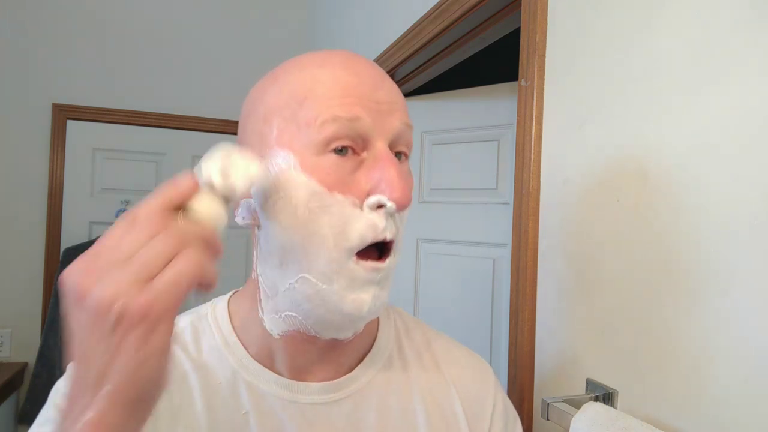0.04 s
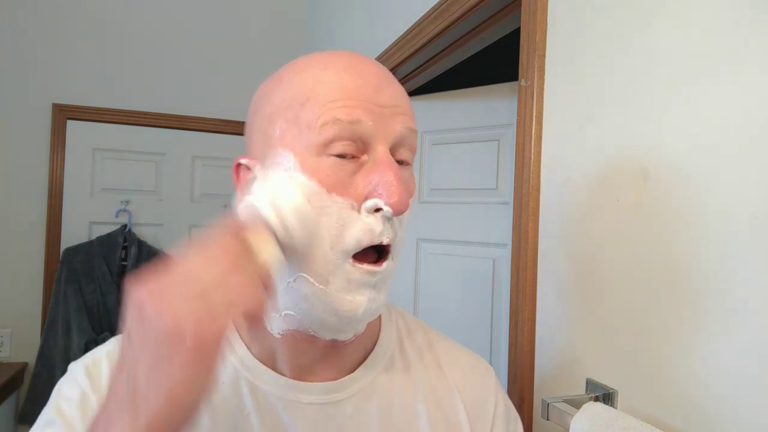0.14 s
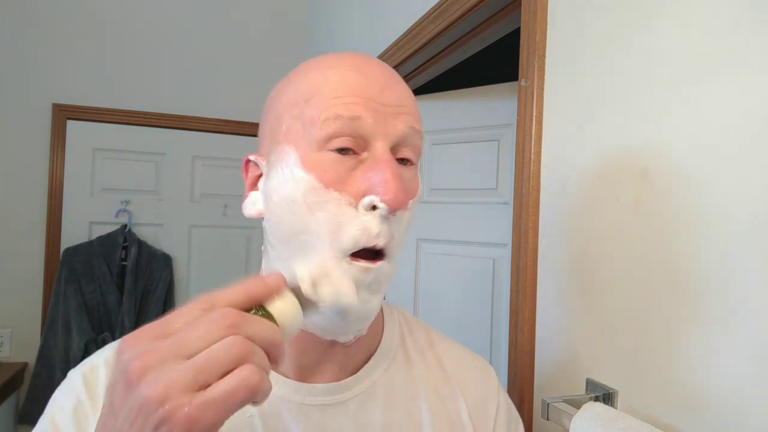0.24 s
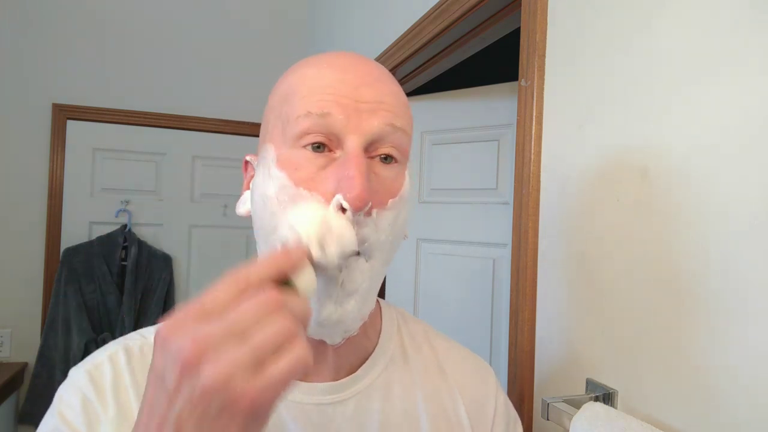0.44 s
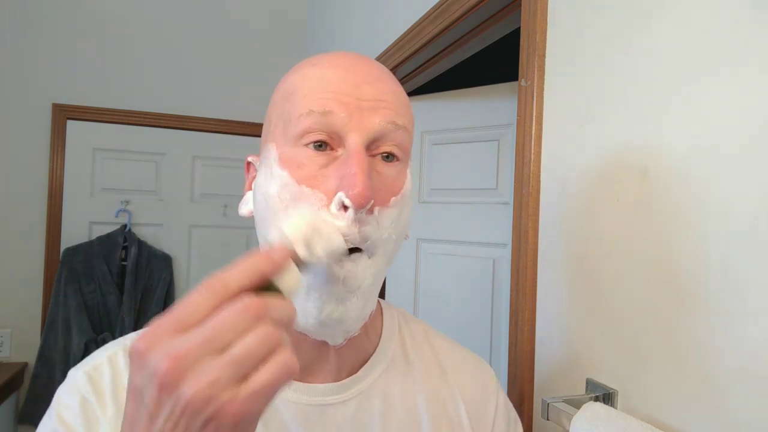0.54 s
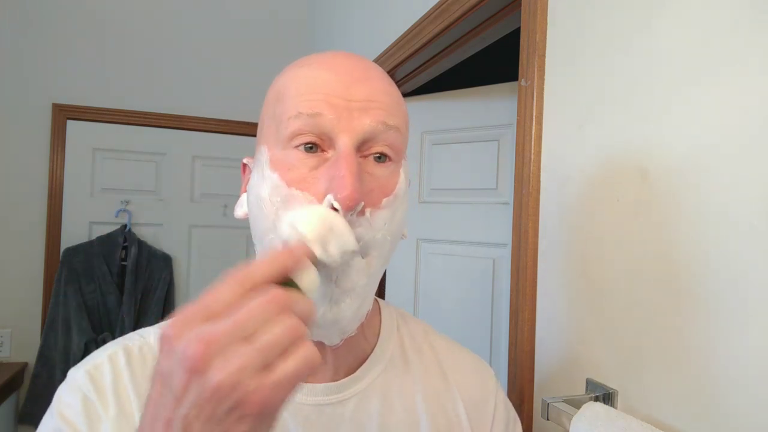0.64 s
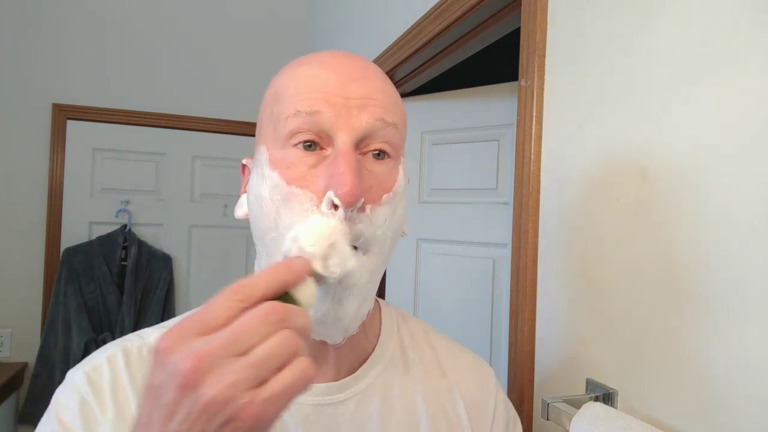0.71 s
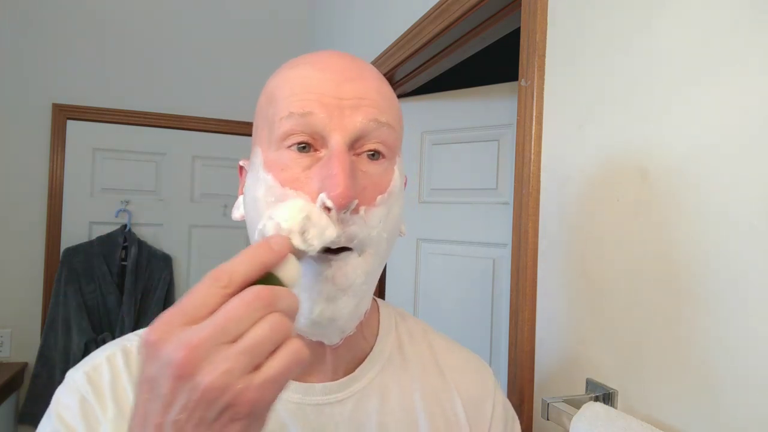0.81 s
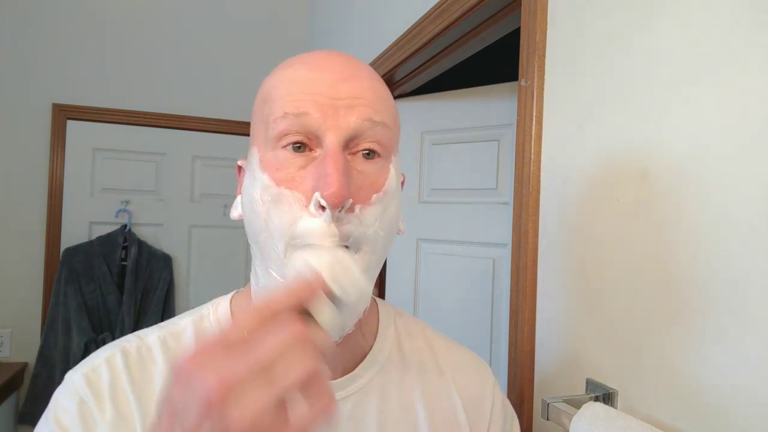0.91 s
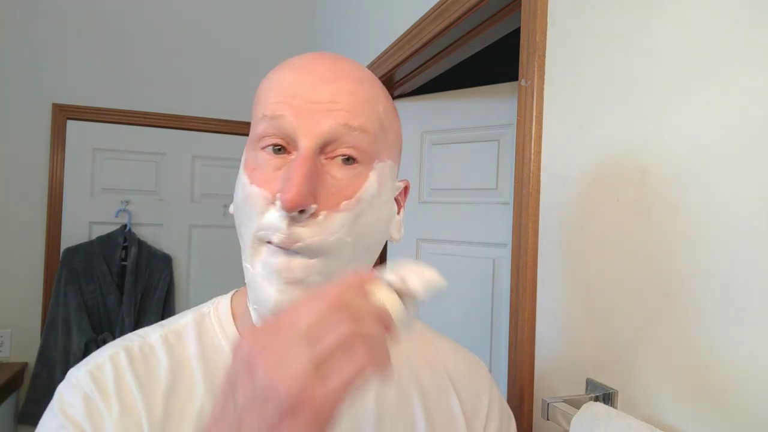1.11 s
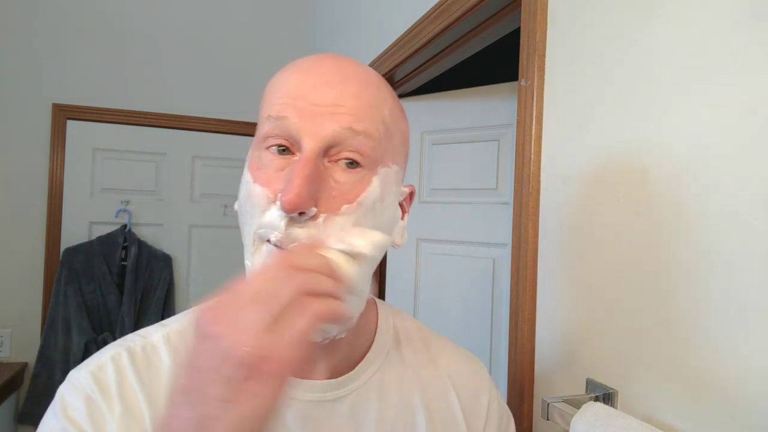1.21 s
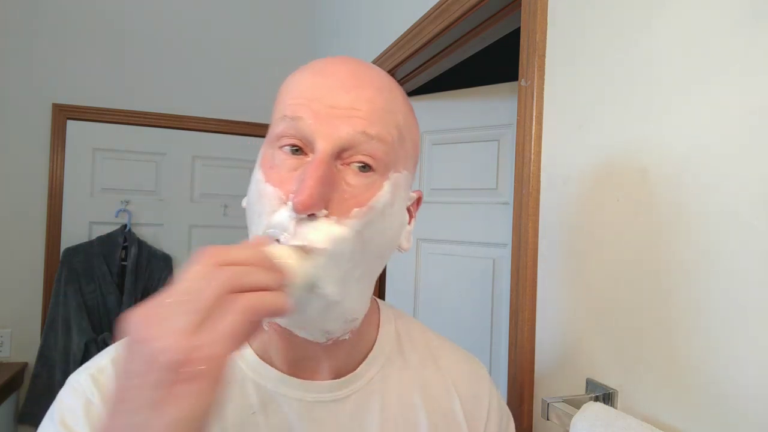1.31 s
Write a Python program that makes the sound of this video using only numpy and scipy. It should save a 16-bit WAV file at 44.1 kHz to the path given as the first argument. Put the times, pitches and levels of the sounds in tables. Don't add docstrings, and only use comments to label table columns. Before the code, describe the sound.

Wet shaving brush dabs thick lather on skin, one loud plop then fainter pats, room ringing.

```python
import sys
import numpy as np
from scipy import signal
from scipy.io import wavfile
from scipy.ndimage import uniform_filter1d

SR = 44100
rng = np.random.default_rng(int(sys.argv[2]) if len(sys.argv) > 2 else 0)


def to_wav(s):
    ch = np.atleast_2d(s).T
    pcm = np.round(np.clip(ch, -1, 1) * 32767)
    wavfile.write(sys.argv[1], SR, pcm.astype(np.int16))


def natural_amplitude(level_db):
    exponent = np.asarray(level_db, float) / 20
    return 10 ** exponent


N = 59535
LEAD = 4410

# f/Hz, density/dB per Hz
HISS_SPECTRUM = [(76, -29), (130, -10.5), (172, -17.5), (279, -18.5), (335, -13.5), (402, -19),
                 (846, -22.5), (2830, -33.5), (16000, -40)]
# f/Hz, width/Hz, level/dB
FAN_RUMBLE = [(30.8, 28, -82), (56.4, 29, -69), (77, 21, -70.5), (114.1, 11.4, -70), (226, 43, -76),
              (320, 270, -78.5)]
# t/s, f/Hz, level/dB
FAN_TONE = [(0.0, 105.8, -70.5), (0.204, 110.9, -70.5), (0.232, 105.7, -70), (0.386, 114, -81),
            (0.425, 98.6, -58), (0.466, 89.5, -68), (0.732, 87.6, -58.5), (0.916, 91.3, -64.5),
            (0.947, 96, -64), (1.069, 94.83, -64), (1.154, 119.7, -70), (1.192, 115.5, -91),
            (1.235, 103.6, -58), (1.286, 97.6, -67), (1.322, 83, -56.5), (1.35, 84, -67)]
# t/s, level/dB
BRISTLE_DRAG = [(0.0, -71), (0.044, -71.5), (0.224, -75), (0.236, -77), (0.254, -58.5), (0.384, -75.5),
                (0.536, -72), (0.545, -61), (0.582, -76.5), (0.887, -72), (1.024, -69.5), (1.1, -89),
                (1.288, -78), (1.35, -69.5)]
# f/Hz, t60/s
WALL_DECAY = [(150, 0.72), (400, 0.91), (700, 0.62), (1300, 0.92), (2760, 0.64), (7280, 0.41),
              (14000, 0.31)]
# f/Hz, level/dB
WALL_COLOUR = [(150, -4.5), (430, -6), (800, -0.5), (1300, -5.5), (3000, 1), (7000, -0.5), (14000, 5.5)]
# f/Hz, level/dB, t60/s
STANDING_WAVES = [(278, -67, 0.77), (326, -51, 0.28), (379, -54, .75), (415.3, -53.5, 0.5),
                  (466, -60.5, 0.42), (492.6, -52, 0.36), (544, -54, 0.37), (576, -56, 0.46),
                  (619, -51.5, 0.25)]
# t/s, peak/dB, f/Hz, t60/s, share reaching the walls/dB
AIR_POCKETS = [(-.061, -27.5, 585, 0.021, -0.5), (-.06, -21, 1150, 0.0044, 5), (.2361, -16, 443, 0.029, -1),
               (.2362, -23.5, 320, 0.023, -0.5), (.2369, -17, 633, 0.0085, -11),
               (.2374, -14.5, 1135, 0.0075, 1.5), (.375, -44, 816, 0.015, 2),
               (.5403, -44, 850, 0.0077, -14), (.5421, -28.5, 740, 0.0083, -3),
               (.5424, -29, 1656, 0.0023, -5.5), (.546, -41, 537, 0.018, 2.5),
               (0.7683, -38.5, 320, 0.01, -3), (.7695, -25.5, 760, 0.0062, -2.5),
               (.7731, -32, 482, 0.0079, 1), (.9744, -35, 722.2, 0.0068, -6.5),
               (.9775, -42.5, 430, 0.0097, 0)]
# t/s, level/dB, centre f/Hz, width/Hz, t60/s
FOAM_SPLASHES = [(-.0601, -40.5, 2400, 2678, 0.017), (-.0600, -40, 4815, 4100, 0.041),
                 (.2316, -53, 7460, 3190, 0.018), (.2367, -33, 5260, 2520, 0.0091),
                 (.2389, -49, 10300, 6060, 0.022), (.2402, -43.5, 6900, 2510, 0.018),
                 (.2404, -40, 2920, 1570, 0.023), (.2407, -45, 4470, 1700, 0.016),
                 (.5321, -60, 5185, 4611, .0062), (.5409, -55, 2900, 3030, 0.016),
                 (.5411, -67, 12000, 6000, .015), (.5425, -46.5, 5700, 3500, 0.0062),
                 (.5427, -50.2, 2390, 1820, 0.0093), (.5446, -51.5, 4800, 2800, 0.027),
                 (.5461, -65, 8400, 1500, 0.011), (.5467, -51.5, 3440, 3400, 0.011),
                 (.6783, -55.2, 8800, 3704, 0.005), (.7696, -58.5, 5093, 2778, .012),
                 (.7711, -64, 2130, 1180, 0.021), (.7721, -65, 7400, 1980, 0.039),
                 (.9752, -61, 2630, 990, 0.0069), (.9951, -61, 6800, 3500, .015),
                 (1.3381, -67.5, 2280, 736.1, 0.032)]
# t/s, peak/dB, f/Hz, t60/s
FOAM_BUBBLES = [
    (0.686, -53, 5990, 0.013),
    (1, -61, 3900, 0.017),
    (0.76, -70, 7100, 0.0039),
]


def evened(x):
    return x / np.sqrt(np.mean(x ** 2) + 1e-20)


def read(points, f_hz):
    f, value = np.transpose(points)
    return np.interp(np.log(f_hz + 1), np.log(f + 1), value)


def add(mix, t_s, sound):
    part = mix[LEAD + round(t_s * SR):][:len(sound)]
    part += sound[:len(part)]


def resonate(x, f_hz, width_hz):
    turn = np.exp(2j * np.pi * f_hz * np.arange(len(x)) / SR)
    r = np.exp(-np.pi * width_hz / SR)
    return 2 * (turn * signal.lfilter([1 - r], [1, -r], x / turn)).real


def resonate_twice(x, f_hz, width_hz):
    return resonate(resonate(x, f_hz, width_hz), f_hz, width_hz)


def room_hiss():
    level_db, patch_db, flicker_db = -65, 0.8, 1.0
    frames, f_hz = N // 256 + 5, np.fft.rfftfreq(1024, 1 / SR)
    real, imag, patches = rng.standard_normal((frames, 513, 3)).T
    patches = uniform_filter1d(patches, 12, 0)
    patches = evened(uniform_filter1d(patches, 14, 1))
    flicker = patches[40]
    gain_db = read(HISS_SPECTRUM, f_hz)[:, None] + patch_db * patches + flicker_db * flicker
    z = (real + 1j * imag) * natural_amplitude(gain_db) * (f_hz > 120)[:, None]
    hiss = signal.istft(z, nperseg=1024, noverlap=768)[1][:N]
    return natural_amplitude(level_db) * evened(hiss)


def fan_rumble():
    settle = 8000
    rumble = np.zeros(N)
    for f_hz, width_hz, db in FAN_RUMBLE:
        noise = rng.standard_normal(N + settle)
        rumble += natural_amplitude(db) * evened(resonate_twice(noise, f_hz, width_hz)[settle:])
    return rumble


def fan_tone():
    t_s, f_hz, db = np.transpose(FAN_TONE)
    t = np.arange(N) / SR
    cycles = np.cumsum(np.interp(t, t_s, f_hz)) / SR
    return np.sqrt(2) * natural_amplitude(np.interp(t, t_s, db)) * np.sin(2 * np.pi * cycles)


def bristle_fizz():
    f_hz, width_hz, ticks_per_s, trim_db, spread_db = 8470, 1670, 7400, -4.5, 1.5
    sizes = natural_amplitude(spread_db * rng.exponential(1, N))
    ticks = sizes * (rng.random(N) < ticks_per_s / SR) * rng.choice([-1, 1], N)
    band = evened(resonate_twice(ticks, f_hz, width_hz))
    t_s, db = np.transpose(BRISTLE_DRAG)
    return natural_amplitude(trim_db + np.interp(np.arange(N) / SR, t_s, db)) * band


def walls(x):
    gap_s, build_s, level_db = 0.0093, 0.0036, 0.5
    taps = np.zeros(SR)
    at = np.arange(0, SR - 20, 20)
    taps[at + rng.integers(0, 20, len(at))] = rng.choice([-1., 1.], len(at))
    f_hz, t, z = signal.stft(taps, SR, nperseg=256)
    z = z * natural_amplitude(read(WALL_COLOUR, f_hz)[:, None] - 60 * t / read(WALL_DECAY, f_hz)[:, None])
    tail = signal.istft(z, SR, nperseg=256)[1]
    tail = tail / np.linalg.norm(tail)
    t = np.arange(len(tail)) / SR
    for f, db, t60_s in STANDING_WAVES:
        tail += natural_amplitude(db - 60 * t / t60_s) * np.sin(2 * np.pi * (f * t + rng.random()))
    tail *= np.clip((t - gap_s) / build_s, 0, 1)
    return natural_amplitude(level_db) * signal.fftconvolve(x, tail)[:len(x)]


def ring(db, f_hz, t60_s):
    rise_cycles = 0.27
    t = np.arange(2600) / SR
    rise = (1 - np.exp(-t * f_hz / rise_cycles)) ** 3
    return natural_amplitude(db - 60 * t / t60_s) * rise * -np.sin(2 * np.pi * f_hz * t)


def splash(db, f_hz, width_hz, t60_s):
    rise_s = 0.0001
    t = np.arange(2000) / SR
    band = evened(resonate_twice(rng.standard_normal(len(t)), f_hz, width_hz))
    burst = natural_amplitude(db - 60 * t / t60_s) * (1 - np.exp(-t / rise_s)) * band
    click = resonate_twice(1. * (t == 0), f_hz, width_hz)
    return burst, evened(click) * np.std(burst)


def pats():
    near, far = np.zeros((2, N + LEAD))
    for t_s, db, f_hz, t60_s, wall_db in AIR_POCKETS:
        add(near, t_s, ring(db, f_hz, t60_s))
        add(far, t_s, ring(db + wall_db, f_hz, t60_s))
    for t_s, *bubble in FOAM_BUBBLES:
        add(near, t_s, ring(*bubble))
    for t_s, *foam in FOAM_SPLASHES:
        burst, click = splash(*foam)
        add(near, t_s, burst)
        add(far, t_s, click)
    thin = signal.butter(4, 181, "high", fs=SR, output="sos")
    return signal.sosfilt(thin, [near, far])


def scene():
    near, far = pats()
    background = room_hiss() + fan_rumble() + fan_tone()
    return (background + bristle_fizz() + (near + walls(far))[LEAD:])[None]


def band_limit(x):
    return signal.sosfilt(signal.butter(12, 16290, fs=SR, output="sos"), x)


def record(dry):
    lowpass = signal.firwin(511, 16100, window=("kaiser", 9), fs=SR)
    mix = signal.oaconvolve(dry, lowpass[None], "same")
    return band_limit(mix)


dry = scene()
out = record(dry)
to_wav(out)
```